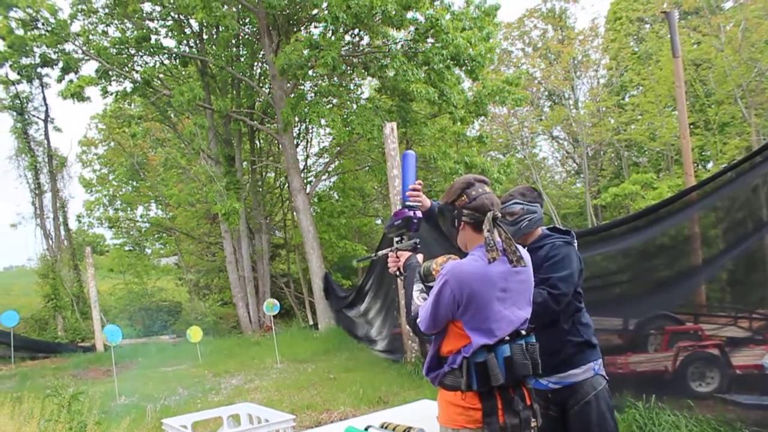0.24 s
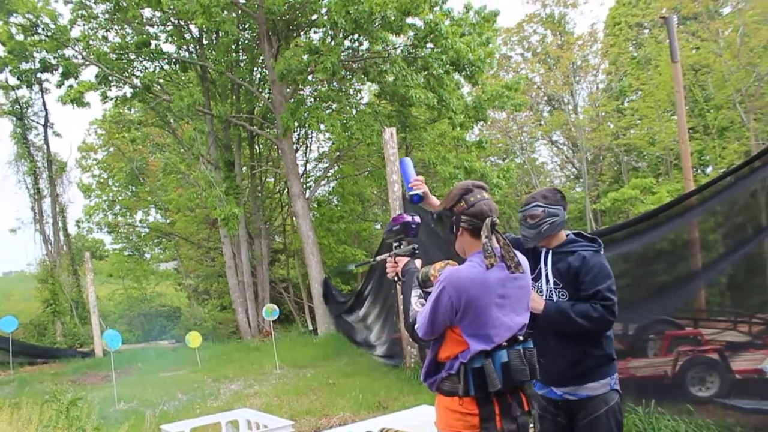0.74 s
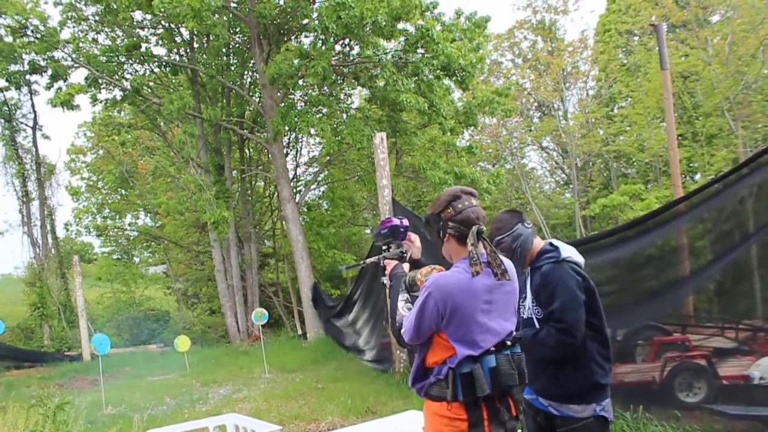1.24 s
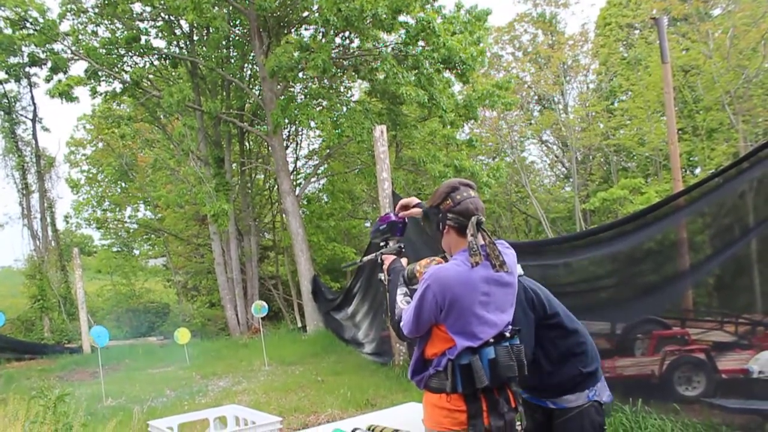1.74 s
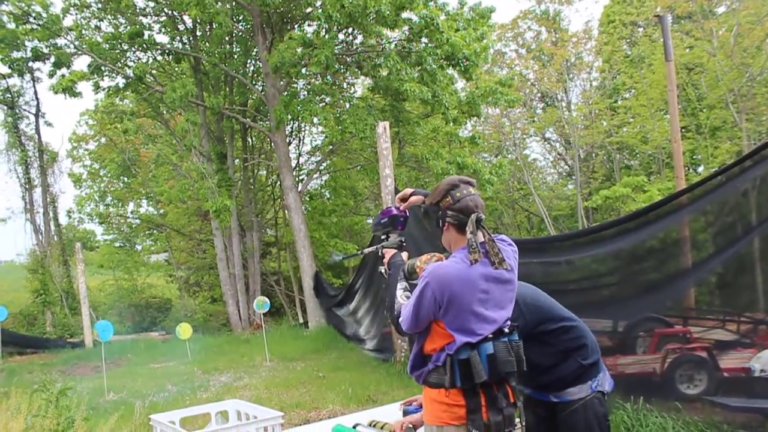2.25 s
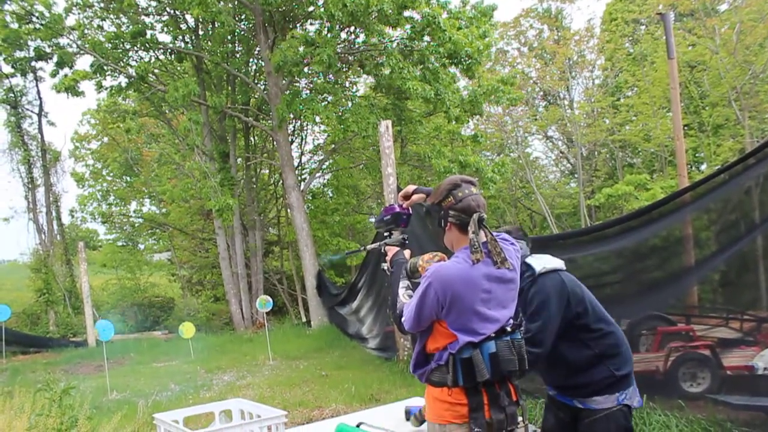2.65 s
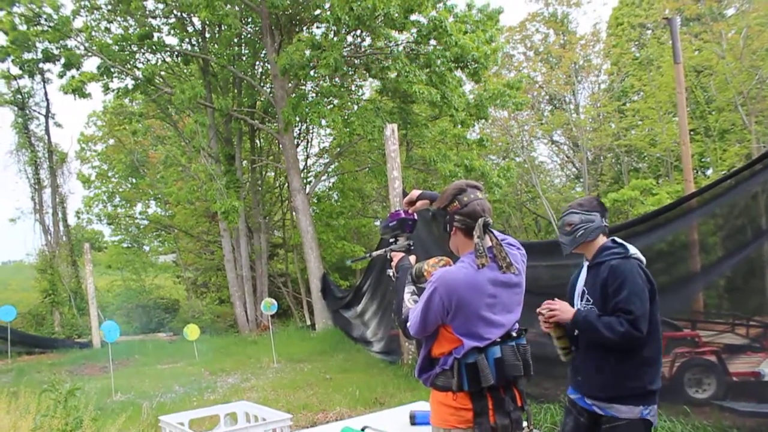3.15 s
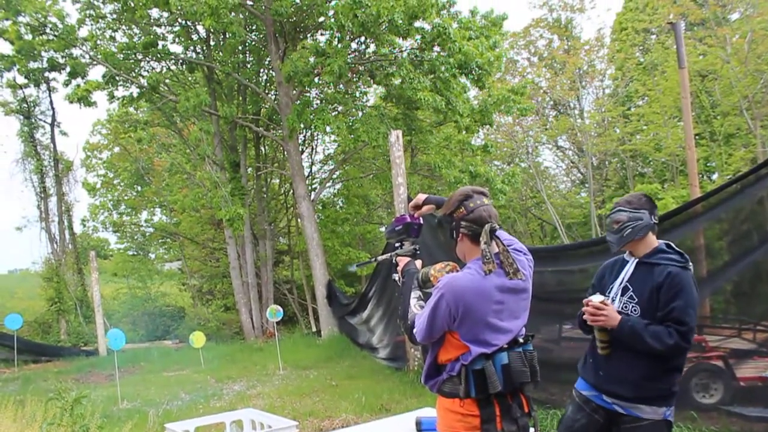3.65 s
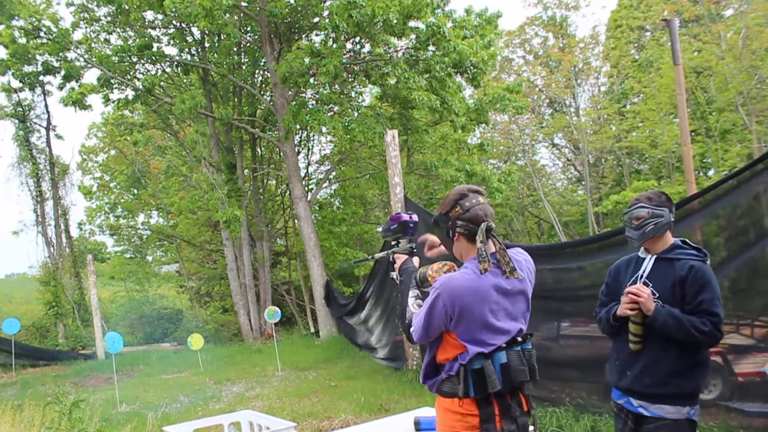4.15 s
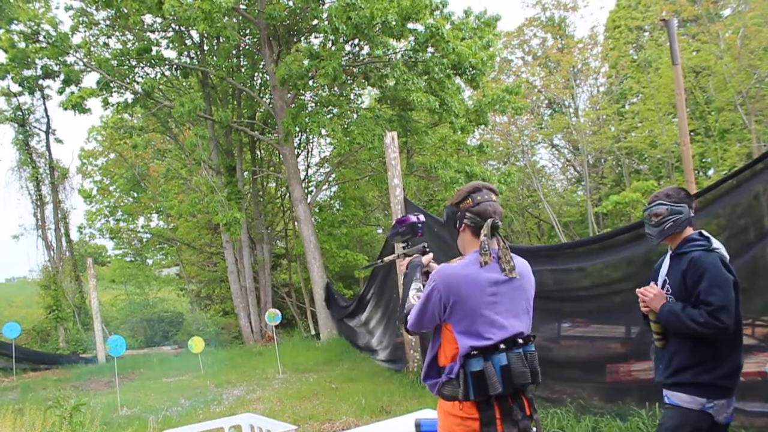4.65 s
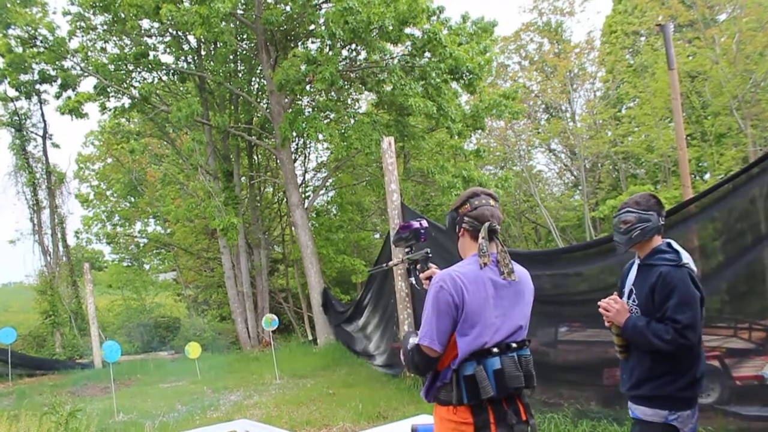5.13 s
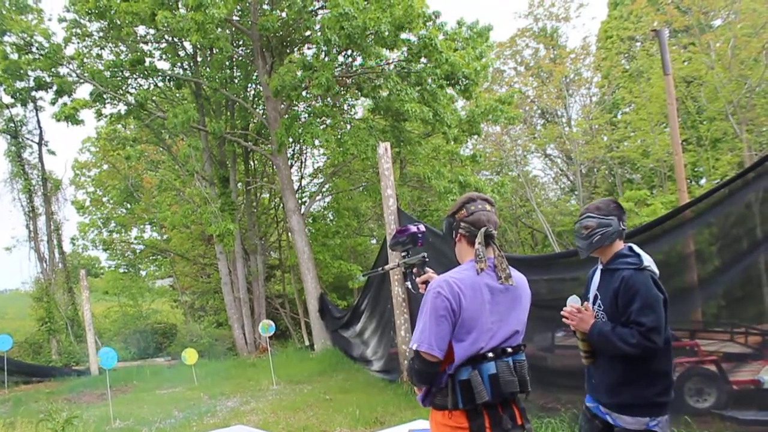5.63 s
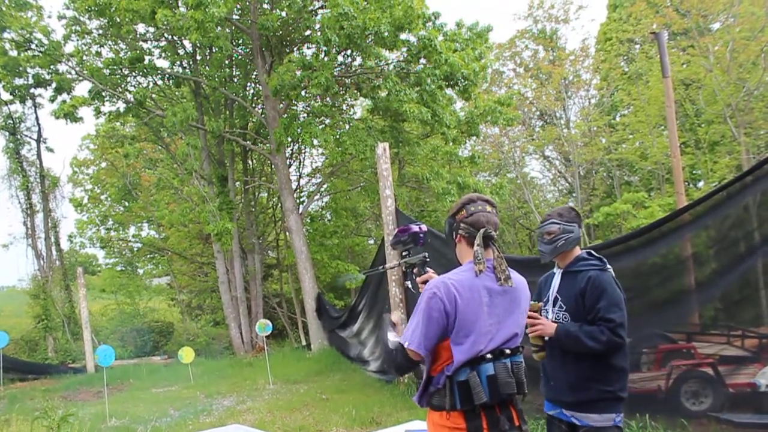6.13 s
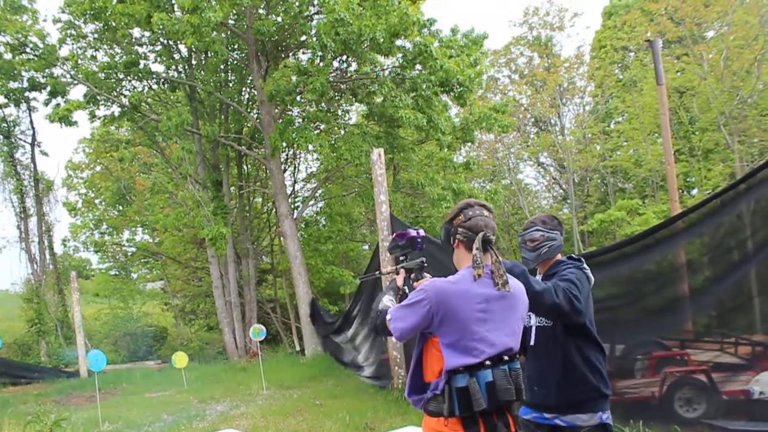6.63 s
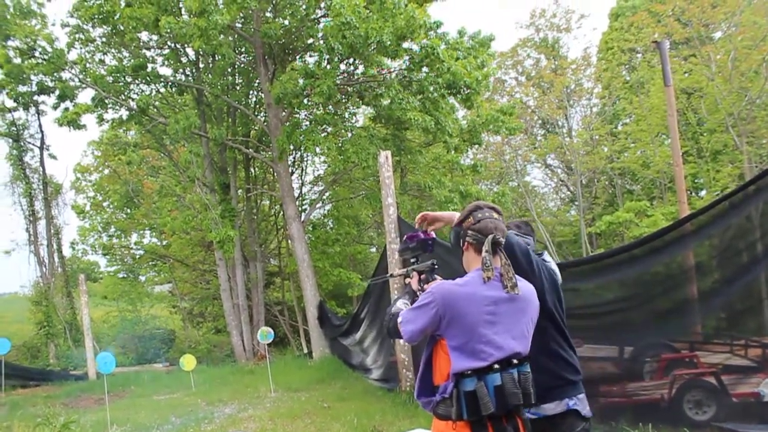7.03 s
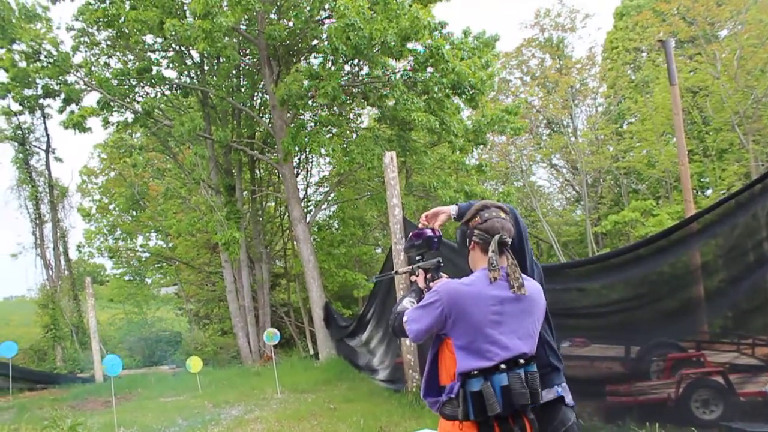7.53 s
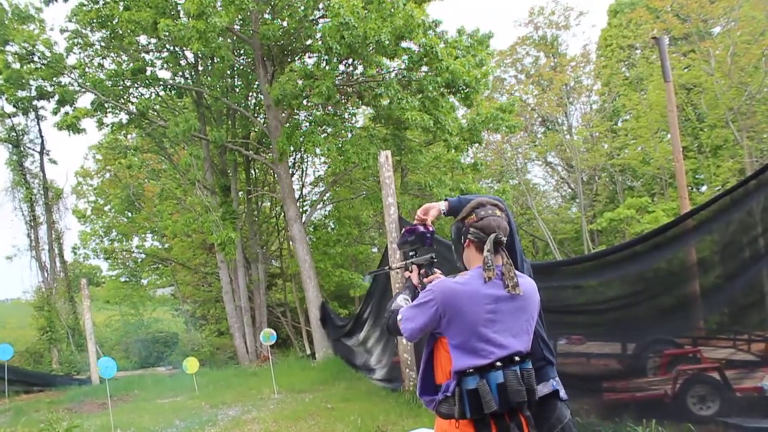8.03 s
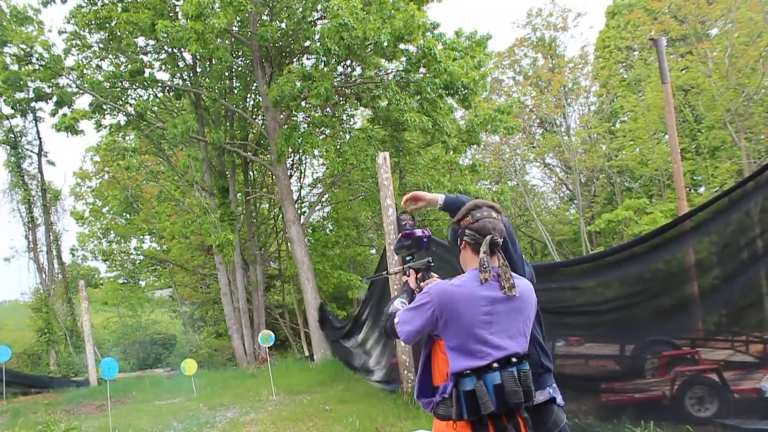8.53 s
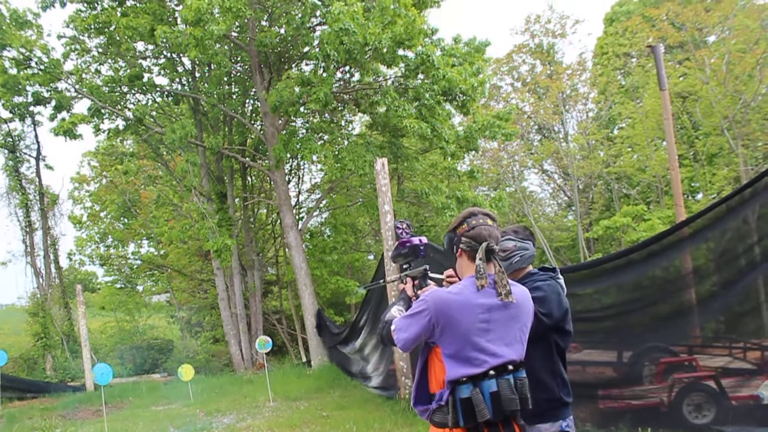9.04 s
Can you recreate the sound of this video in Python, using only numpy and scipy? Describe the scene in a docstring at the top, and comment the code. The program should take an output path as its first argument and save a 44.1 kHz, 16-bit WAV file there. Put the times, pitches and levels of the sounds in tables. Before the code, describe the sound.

A paintball marker fires close by outdoors, starting at once with an even string of sharp pops, about twelve a second, that stutters to a stop near 1.4 seconds. Balls splat on a metal target with ringing pings of varying pitch. At 2.1 seconds a brief honk of escaping air precedes one loud shot, and two more strings run from 2.4 to 4.2 seconds. Two plastic clicks follow near 4.4 seconds, and a soft breeze swells in the trees with a faint rumble around 5 seconds. Three loud single shots come between 5.3 and 5.8 seconds, the first two led by short hisses. The longest string lasts from 6 to 8.4 seconds, again with pings. After two clicks, a last burst runs from 8.5 to about 9.3 seconds with more ticks and hits. The trees return a light echo, and the loudest shots overload the microphone.

```python
"""Rapid strings of sharp pops, 12.5 a second, with splats and metallic pings: a paintball marker outdoors.
Each shot is a valve hiss, a bolt clack and a pulse of expanding gas that sets the barrel ringing.
Many balls burst on a metal target and excite its modes. Nearby objects scatter the shots back at once,
the tree line later. In the pauses a breeze rushes through the trees.
The loudest shots overload the microphone."""
import sys
import numpy as np
from scipy import signal
from scipy.fft import rfft, irfft, next_fast_len
from scipy.io import wavfile
from scipy.ndimage import map_coordinates

SR = 44100
rng = np.random.default_rng(int(sys.argv[2]) if len(sys.argv) > 2 else 0)


def persist_wave(psi):
    """Save psi, clipped to +-1, as 16-bit WAV."""
    counts = np.round(np.clip(psi, -1, 1) * 32767).astype(np.int16)
    wavfile.write(sys.argv[1], SR, np.atleast_2d(counts).T)


N = 409232
CYCLE_S = .07985  # firing period

# spectrum of gas spits and plastic ticks: frequency_hz, level_db
CRACK_SPECTRUM = [(300, -39), (1000, -24), (2000, -4), (2800, 2), (3400, -8.5), (4200, -0.5), (5000, -2),
                  (5900, -12.5), (6700, -3.5), (7300, -5.5), (8000, -10.5), (9500, -12), (11300, -18),
                  (16000, -22)]
# spectrum of air escaping from a valve: frequency_hz, level_db
HISS_SPECTRUM = [(100, 17), (900, 6.5), (3000, 5.5), (7000, 7), (10000, 5), (13500, 10.5), (16000, 2)]


def marker(fired):
    """Impulsive excitation: bolt, valve and muzzle each push and spit gas; the blast rings the barrel."""
    # blows of one cycle, timed from the blast: delay_s, push_db, gas_db, db_per_accent_db
    blows = [(-.0062, -52, -17.5, 0.86), (-.0045, 0.5, -7, 0.18), (-.0013, -5, -4, 0.05),
             (0, 1.5, 0.5, -0.24), (.0042, -10, -15, -0.37), (.011, -8, -11, -0.9)]
    # modes of barrel and body: frequency_hz, level_db, t60_s
    body_modes = [(85, -25, 0.051), (243, -13.5, 0.05), (320.8, -18, 0.069), (411, -39, 0.2),
                  (532, -15.5, 0.026), (646, -7, 0.049), (921.4, -14, 0.067), (971.5, -10.5, 0.035),
                  (1200, -31.5, 0.18), (1536, -24, 0.096), (1558, -18, 0.092), (1661, -4.5, 0.03),
                  (2395, -6.5, 0.023), (2370, -75, .035), (2800, -18, 0.07), (3070, -18, 0.053),
                  (3960, -8, 0.017), (4270, -53, 0.011), (4600, -34, 0.028), (7240, -12.5, .02)]
    # spectrum of one pressure pulse: frequency_hz, level_db
    pop_spectrum = [(30, -67.5), (80, -28.5), (125, -32), (210, -4), (300, 4.5), (380, 0.5), (620, -12.5),
                    (750, -6.5), (950, -4.5), (1600, 4), (1950, -16.5), (2800, -2), (5000, -19.5),
                    (12000, -71)]
    # a small muzzle radiates little bass: frequency_hz, gain_db
    radiation = [(30, -30.5), (80, -11), (120, -26.5), (150, -15), (190, 2), (16000, -3.5)]
    out, t = np.zeros(N), seconds(.1)
    lead_s, thump_rise_s = .03, .0031  # the mechanism starts ahead of the blast
    hz, mode_db, t60 = np.transpose(body_modes)
    ringing = fade(t, t60[:, None]) * np.sin(2 * np.pi * hz[:, None] * t)
    for s, pop_db, crack_db, accent_db in fired:
        pushes, gas, ring = np.zeros((3, len(t)))
        for delay, push_db, gas_db, growth in blows:
            at = lead_s + delay + rng.normal(0, .00002)
            add(pushes, at, amp([push_db + growth * accent_db + rng.normal(0, 0.98)]))
            spit = noise(CRACK_SPECTRUM, len(t)) * (fade(t, 0.006) + 0.051 * fade(t, 0.13))
            add(gas, at, amp(gas_db + growth * accent_db) * spit)
        add(ring, lead_s - .001, amp(mode_db + rng.normal(0, 1, len(hz))) @ ringing)
        # in louder shots the blast grows more than the ring of the body
        blast = amp(pop_db + 36.5) * coloured(pushes, pop_spectrum)
        shot = blast + amp(0.71 * pop_db + 8) * ring + amp(crack_db + 7) * gas
        # a low thump under each shot, strongest under the loudest ones
        thump = t / thump_rise_s * np.exp(-t / thump_rise_s)
        add(shot, lead_s, amp(pop_db + 4.5 + 0.32 * accent_db) * thump)
        # the pilot valve hisses just before the bolt moves
        add(shot, lead_s - .026, amp(-33.5) * noise(HISS_SPECTRUM, len(t)) * fade(t, 0.059))
        add(out, s - lead_s, tree_line(shot, trees_db=-22))
    # the marker stays put, so its surroundings colour every shot alike
    return nearby(coloured(out, radiation), near_db=-11.5, near_t60=0.042)


def shots():
    """Periodic pulse train: a string usually opens louder, and its level settles within a few shots."""
    # strings of fire: start_s, shot_count, pop_db, first_accent_db
    strings = [(0.022, 14, -27.5, 0), (1.1486, 2, -23.5, -4), (1.3242, 2, -30, 3.5), (2.0933, 1, -26, 11.5),
               (2.4398, 7, -26.5, 8), (3.1392, 14, -28, 5.5), (5.3187, 1, -25.5, 14.5),
               (5.5561, 1, -26, 12), (5.776, 1, -29.5, 10.5), (6.0192, 31, -25.5, 3),
               (8.5436, 10, -26.5, 3)]
    accent_left = 0.23  # share passed on to the next shot
    rows = []  # start_s, pop_db, crack_db, accent_db
    for start, count, pop_db, first_accent_db in strings:
        k = np.arange(round(count))
        accent_db = first_accent_db * accent_left ** k
        crack_db = -15.5 + 0.89 * accent_db
        rows.extend(zip(start + CYCLE_S * k, pop_db + accent_db, crack_db, accent_db))
    return np.array(rows) - rng.normal(0, [0, .6, .6, 0], (len(rows), 4))


def vents():
    """Flow-induced vibration: escaping air hisses and can set the seal honking until the valve shuts."""
    # blow-offs ahead of the first shots after a rest: start_s, hiss_db, honk_db
    blow_offs = [(2.067, -22, -11), (2.414, -27, -44), (5.292, -17.5, -48), (5.53, -22.5, -54)]
    # spectrum of air beating past the seal: frequency_hz, level_db
    flutter = [(40, -2), (120, -8), (250, 5), (600, -2.5), (1500, -2.5), (3000, -10), (12000, -46)]
    out, t = np.zeros(N), seconds(.03)
    sealing = np.clip((t[-1] - t) / 0.0083, 0, 1)
    for s, hiss_db, honk_db in blow_offs:
        hiss = noise(HISS_SPECTRUM, len(t)) * (fade(t, 0.032) + 0.22)
        pitch_hz = 590 + 250 * fade(t, 0.032)
        tone = np.sin(2 * np.pi * np.cumsum(pitch_hz) / SR)
        honk = tone + 1.37 * noise(flutter, len(t)) * fade(t, 0.049)
        honk *= amp(honk_db) * (1 - np.exp(-t / 0.0019))
        add(out, s, sealing * (amp(hiss_db) * hiss + honk))
        tree_echo = scatter(sealing * honk, flutter, fade(seconds(0.29), 0.18))
        add(out, s + .08, amp(-22.5) * tree_echo)
    return out


def target(landed):
    """Modal vibration: each ball splats and rings the plate; the spot struck favours one mode, a ping."""
    # modes of the metal plate: frequency_hz, level_db, t60_s
    plate_modes = [(502, -26.5, 1.8), (635, -21, 0.52), (656.8, -15, 2.53), (834, -7.5, 0.31),
                   (891, -6, 0.17), (1058, -8, 0.6), (1180, -14, 0.13), (1520, -6.5, 0.19),
                   (1654, -2, 0.34), (1827, -8, 0.8), (2180, -4.5, 0.3), (2340, -11, 0.23),
                   (2580, -4, 0.44), (2706, -3.5, 0.5), (2745, -7.5, 0.57), (2846, -1.5, 0.31),
                   (3160, -1.5, 0.22), (3520, -23, 0.14), (3680, -7.5, 0.48), (4000, -36, 0.11),
                   (4800, -3.5, 0.082), (5000, -13, 0.32), (5760, -27, 0.13), (5950, 2.5, 0.064),
                   (6300, -33, 0.09), (7200, -6, 0.054), (8200, -38, .1)]
    # spectrum of a bursting ball: frequency_hz, level_db
    splat_spectrum = [(60, -49), (200, -8), (400, -31), (650, -2.5), (1300, 1), (2700, 1.5), (6000, 0),
                      (8500, -6.5), (16000, -14.5)]
    # the splats and rings carry little bass: frequency_hz, gain_db
    radiation = [(30, -41), (200, -5), (450, -1), (16000, -1.5)]
    out, t, burst = np.zeros(N), seconds(1.2), seconds(.3)
    hz, mode_db, t60 = np.transpose(plate_modes)
    # the first large swings lose energy in the mount faster than the tail
    ringing = fade(t, t60[:, None]) * (0.65 + fade(t, 0.33)) * np.exp(2j * np.pi * hz[:, None] * t)
    # the shell cracks, the paint spreads, droplets patter on
    splash = amp(7.5) * fade(burst, 0.0032) + amp(3) * fade(burst, 0.031) + amp(-10) * fade(burst, 0.43)
    for s, db, low_db, ping_hz, ping_db in landed:
        # the other overtones give up energy to the ping; the low bending modes have their own strength
        distance = np.abs(np.log(hz / ping_hz))
        loss_db = ping_db * np.minimum(0.037 + .5 * distance, 1)
        overtone_db = np.where(distance == distance.min(), .7 * ping_db, -loss_db)
        favour_db = np.where(hz < 800, low_db + 16.5, overtone_db)
        strengths = amp(mode_db + favour_db + rng.normal(0, 2.5, len(hz)))
        phases = np.exp(2j * np.pi * rng.random(len(hz)))
        ring = ((strengths * phases) @ ringing).real
        splat = noise(splat_spectrum, len(burst)) * splash
        # each spot also wakes its own few of the plate's many short-lived overtones
        spot_hz = np.exp(rng.uniform(np.log(1000), np.log(8000), size=(9, 1)))
        clank = np.sin(2 * np.pi * spot_hz * burst).sum(0)
        clank *= fade(burst, 0.058) * (1 - np.exp(-burst / 0.00043))
        add(out, s, amp(db - 7) * ring)
        add(out, s, amp(db - 8) * clank)
        add(out, s, tree_line(amp(db) * splat, trees_db=-22))
    return coloured(out, radiation)


def hits(fired):
    """Time of flight: besides the distinct hits, each well-aimed ball is heard a delay after its shot."""
    # hits set apart by their ring or by a gap: start_s, level_db, low_tone_db, ping_hz, ping_db
    distinct_hits = [(0.0, -29, 2, 2718, 17), (0.0718, -24, -23, 2690, 15),
                     (0.7841, -24.5, -29, 1830, 18.5), (1.0224, -21.5, -3.5, 1860, 10.5),
                     (1.1107, -24.5, -4, 1080, 7), (1.4465, -23.5, -4, 1820, 6), (1.5292, -25, -7, 2540, 6),
                     (2.219, -17.5, -4, 4550, 14), (2.5627, -22, -5.5, 1810, 5),
                     (2.8019, -23.5, -16, 1860, 12), (2.8878, -23.5, -2, 2734, 23),
                     (2.9646, -23, -6, 1820, 13), (3.0412, -22.5, -6, 2700, 5),
                     (3.2718, -27.5, -9, 2770, 2), (3.419, -26.5, 0, 2684, 10),
                     (3.4998, -23.5, -6.5, 2700, 9), (3.6598, -24, -25, 2800, 12),
                     (3.815, -24, -10, 2710, 7), (3.9098, -23, -5, 1680, 13.5),
                     (4.2265, -30.5, 0.5, 2590, 9), (5.6761, -14.5, -6.5, 1820, 1),
                     (5.9063, -22, -26, 1520, 11), (6.5456, -20, -5.5, 1850, 9),
                     (7.5051, -23, -12, 1800, 11), (7.8957, -25, -17, 2800, 2),
                     (7.9829, -22.5, -15, 1840, 13), (9.0694, -23.5, -19, 1110, 6),
                     (9.1453, -23.5, -22, 1850, 13)]
    # spans of good aim: start_s, end_s, level_db
    on_target = [(0, 1.02, -23.5), (2.48, 2.56, -26.5), (2.64, 4.14, -24), (5.98, 6.14, -25),
                 (6.46, 6.54, -30), (6.62, 7.42, -24), (7.66, 7.9, -27.5), (8.9, 9.28, -26.2)]
    # pitches favoured by different spots on the plate: pitch_hz
    spot_pitches = [1520, 1688, 1821, 2570]
    delay_s, low_tone_db, ping_db = .127, -9.5, 7.5
    rows = list(distinct_hits)
    distinct_s = np.transpose(distinct_hits)[0]
    chance = rng.normal(0, [.0015, 2], (len(fired), 2))
    pings = rng.choice(spot_pitches, len(fired))
    for s, (late_s, extra_db), ping_hz in zip(fired[:, 0], chance, pings):
        ordinary = np.abs(distinct_s - s - delay_s).min() > CYCLE_S / 2
        for start, end, db in on_target:
            if ordinary and start <= s <= end:
                rows.append((s + delay_s + late_s, db + extra_db, low_tone_db, ping_hz, ping_db))
    return rows


def clicks():
    """Damped impacts: plastic parts of the marker and its loader give short ticks."""
    # light contacts: start_s, level_db
    contacts = [(2.4927, -33), (4.4137, -16), (4.455, -4), (5.5964, -15), (8.3782, -6), (8.4563, -7.5),
                (8.9007, -6.5), (8.972, -7)]
    out, t = np.zeros(N), seconds(.08)
    for s, db in contacts:
        tick = noise(CRACK_SPECTRUM, len(t)) * (fade(t, 0.0019) + 0.084 * fade(t, 0.09))
        add(out, s, tree_line(amp(db - 9.5) * tick, trees_db=-12))
    return nearby(out, near_db=-9, near_t60=.09)


def nearby(x, near_db, near_t60):
    """Early reflections: post, table and people add a quick answer to the direct sound."""
    # spectrum of the reflections: frequency_hz, level_db
    spectrum = [(150, -43), (300, 10), (700, -2.5), (1500, 1.5), (2500, 3), (5000, -7.5), (15000, 1.5)]
    t = seconds(.15)
    envelope = fade(t, near_t60) * (1 - np.exp(-t / 0.015))
    return x + amp(near_db) * scatter(x, spectrum, envelope)[:len(x)]


def tree_line(x, trees_db):
    """Diffuse reflection: the trees add a late echo, different each time as the leaves move."""
    # spectrum of the echo: frequency_hz, level_db
    spectrum = [(100, -3), (400, -10), (1000, -2.5), (4000, 0), (8000, 0), (12000, -3.5), (16000, -1.5)]
    t = seconds(.6)
    late = np.maximum(t - .082, 0)  # time since the round trip to the trees
    envelope = 0.34 * fade(t, 1.0) + fade(late, 0.093) * (1 - np.exp(-late / 0.0047))
    wet = amp(trees_db) * scatter(x, spectrum, envelope)
    wet[:len(x)] += x
    return wet


def breeze():
    """Turbulent flow: air rushes softly through the trees, beside a faint high background hiss."""
    # course of the background: time_s, rush_db, hiss_db
    course = [(0, -40.5, -44), (1.7, -52.5, -66), (2.05, -47.5, -61), (4.3, -45, -58), (4.62, -44.5, -63),
              (4.78, -38.5, -57.5), (4.93, -37, -54.5), (5.15, -40, -55.5), (5.5, -46, -63),
              (6.0, -43, -48), (8.4, -46.5, -48.5), (9.28, -46.5, -54)]
    # spectra of the rush and of the hiss: frequency_hz, level_db
    rush_spectrum = [(15, -53), (25, -33), (97, -7.5), (175, -11), (206, -3.5), (270, -10), (394, -6),
                     (591, -3), (695, -4), (775, -5.5), (962, 2), (1040, -3.5), (1160, -4.5), (1840, -11.5),
                     (16000, -55)]
    hiss_spectrum = [(1000, -17), (3000, 0), (8000, -9), (16000, -15)]
    s, rush_db, hiss_db = np.transpose(course)
    t = np.arange(N) / SR
    rush = amp(np.interp(t, s, rush_db) + .6 * wobble(12)) * noise(rush_spectrum, N)
    # the hiss rises and falls, loudest at the start and from 6 s on
    hiss = amp(np.interp(t, s, hiss_db) + 0.44 * wobble(1.5)) * noise(hiss_spectrum, N)
    return rush + hiss


def gust():
    """Pressure fluctuation: in the long pause the breeze swells enough to rumble on the microphone."""
    # spectrum of the rumble: frequency_hz, level_db
    spectrum = [(15, -7), (40, 3), (90, 1), (160, -14), (400, -48), (16000, -100)]
    peak_s, width_s, peak_db = 5, 0.34, -56.5
    swell = np.exp(-.5 * ((np.arange(N) / SR - peak_s) / width_s) ** 2)
    return swell * amp(peak_db + 1.5 * wobble(8)) * noise(spectrum, N)


def scatter(x, points, envelope):
    """Convolution with the answers of many small surfaces, which follow the envelope."""
    tail = noise(points, len(envelope)) * envelope
    return signal.fftconvolve(x, tail / np.linalg.norm(tail))


def coloured(x, points):
    """Minimum-phase filtering: folding the cepstrum makes the given spectrum causal."""
    cepstrum = irfft(np.log(gains(points, size=4096)))
    half = len(cepstrum) // 2
    cepstrum[1:half] *= 2
    cepstrum[half + 1:] = 0
    response = irfft(np.exp(rfft(cepstrum)))[:half]
    return signal.fftconvolve(x, response)[:len(x)]


def noise(points, size):
    """Gaussian noise of rms 1 with the given spectrum."""
    padded = next_fast_len(size, True)
    x = irfft(rfft(rng.standard_normal(padded)) * gains(points, padded), padded)[:size]
    return x / np.sqrt(np.mean(x ** 2) + 1e-20)


def gains(points, size):
    """Log-frequency interpolation of (frequency_hz, level_db) points to gains on an FFT grid."""
    hz, db = np.transpose(points)
    return amp(np.interp(np.log(np.fft.rfftfreq(size, 1 / SR) + 1), np.log(hz), db))


def wobble(rate):
    """Smooth random modulation, rate knots a second."""
    knots = rng.standard_normal(int(N * rate / SR) + 4)
    return map_coordinates(knots, [np.arange(N) * rate / SR])


def fade(t, t60):
    """Exponential decay by 60 dB in t60 seconds."""
    return np.exp(-np.log(1000) * t / t60)


def add(track, s, sound):
    """Superposition of a sound on the track at s seconds."""
    i = round(s * SR)
    sound = sound[max(-i, 0):]
    part = track[max(i, 0):][:len(sound)]
    part += sound[:len(part)]


def amp(db):
    return 10 ** (np.asarray(db) / 20)


def seconds(length):
    return np.arange(int(length * SR)) / SR


def scene():
    """Superposition of the shots, their hits down the range and the air around them, in mono."""
    fired = shots()
    return (marker(fired) + vents() + target(hits(fired)) + clicks() + breeze() + gust())[None]


def record(dry):
    """Saturation and band limiting: the input clips at full scale and loses the highest treble."""
    top_hz = 15850
    clipped = np.clip(dry, -1, 1)
    return irfft(rfft(clipped) * (np.fft.rfftfreq(N, 1 / SR) < top_hz), N)


dry = scene()
out = record(dry)
persist_wave(out)
```